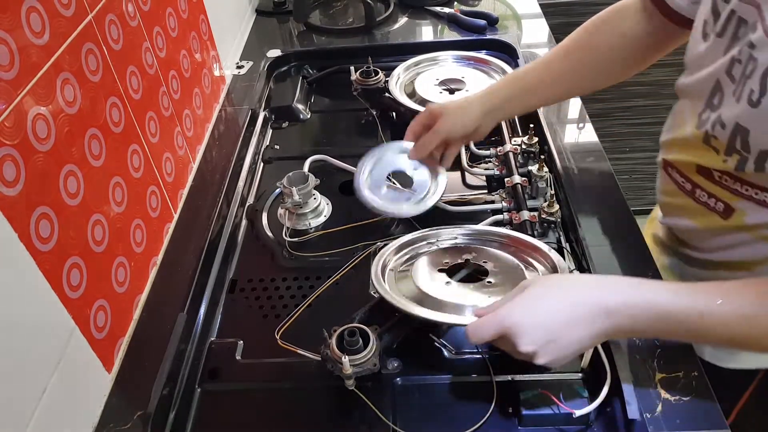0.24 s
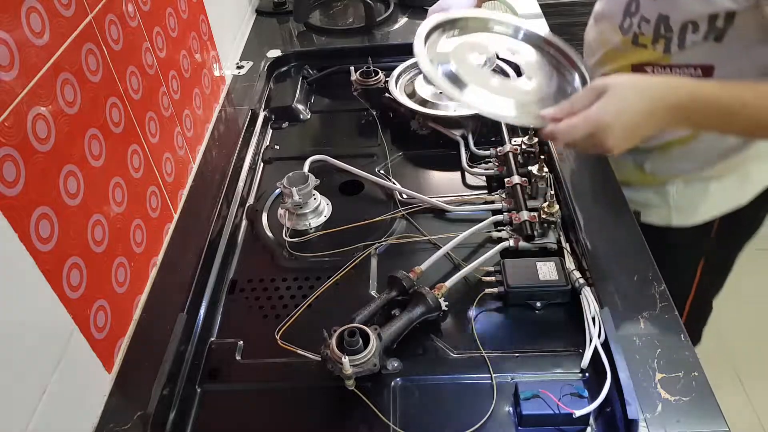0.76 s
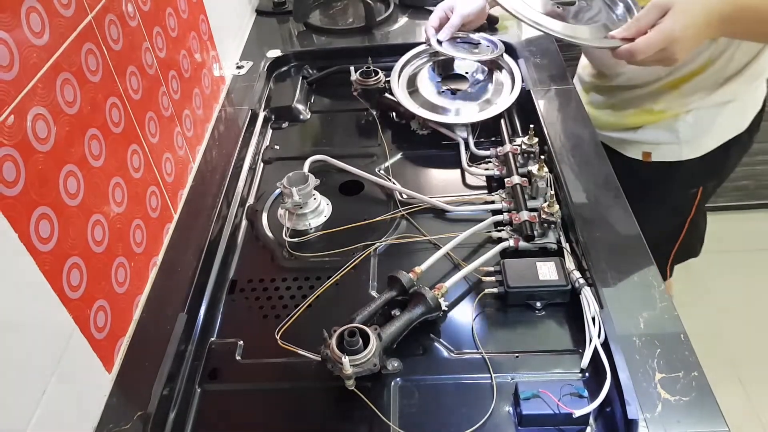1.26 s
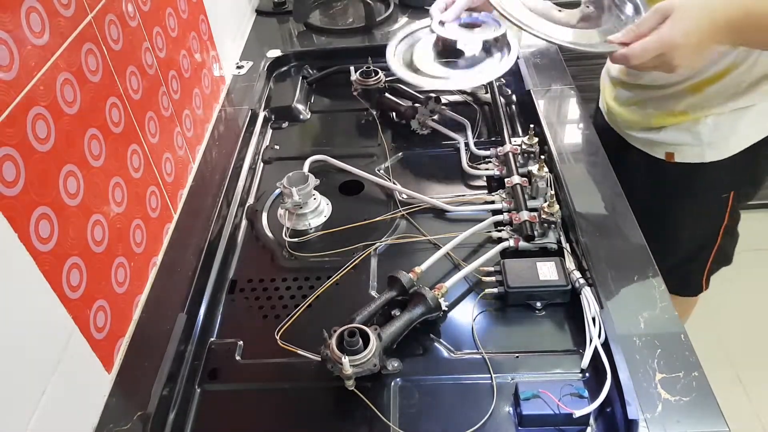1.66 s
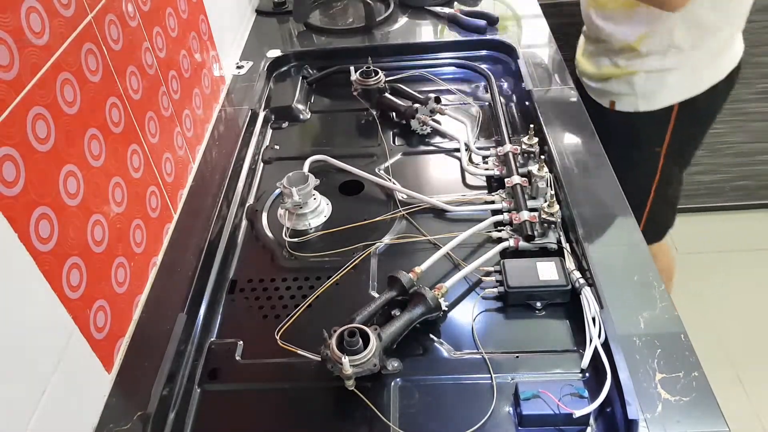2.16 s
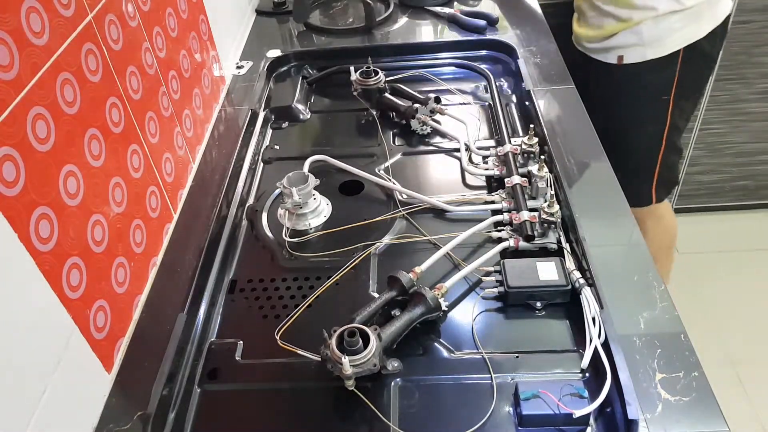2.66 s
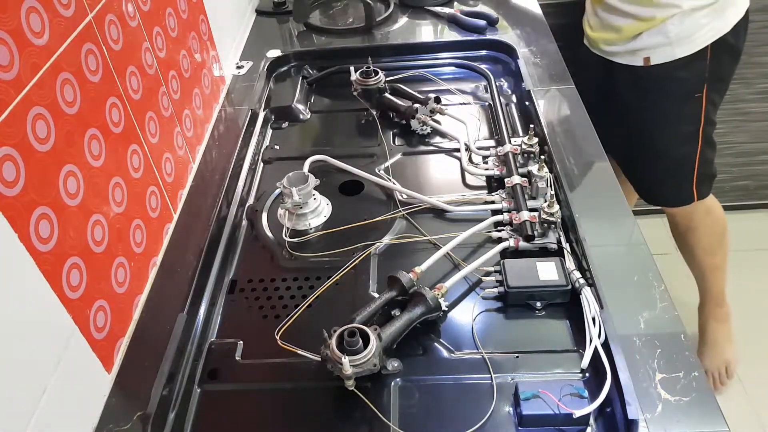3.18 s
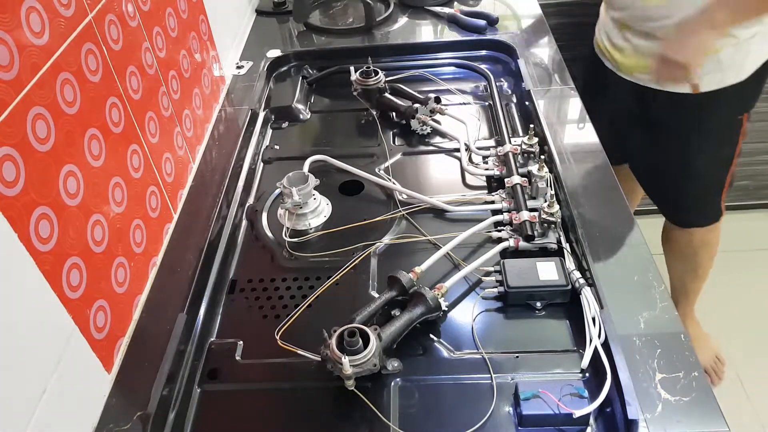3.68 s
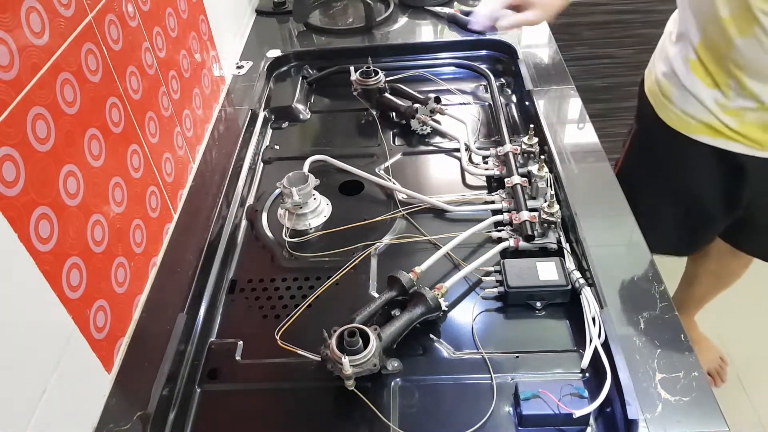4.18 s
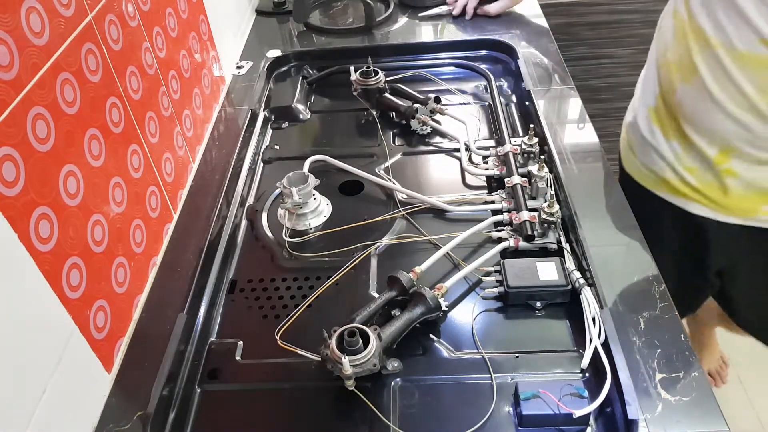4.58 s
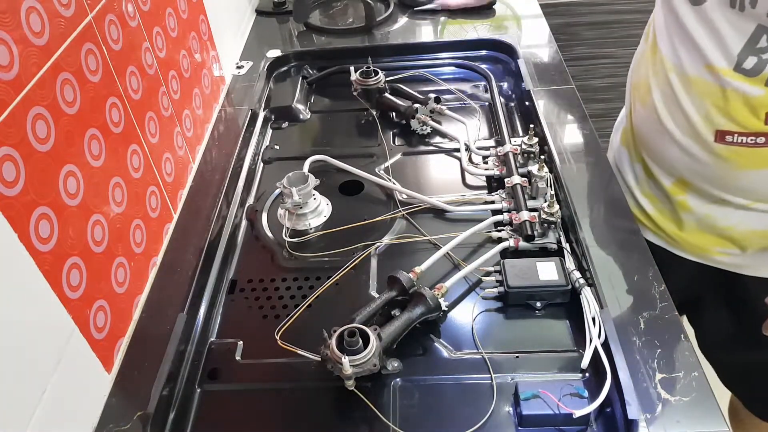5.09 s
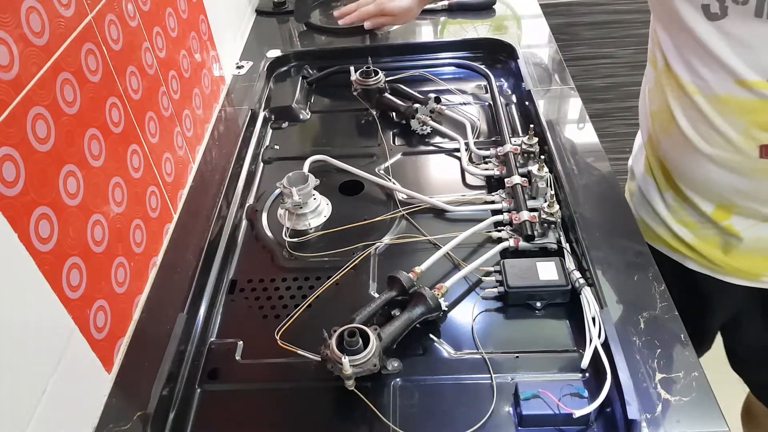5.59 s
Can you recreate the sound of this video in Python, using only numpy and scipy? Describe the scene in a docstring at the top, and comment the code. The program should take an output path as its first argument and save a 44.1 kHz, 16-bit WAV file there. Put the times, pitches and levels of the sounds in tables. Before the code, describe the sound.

Thin steel plates knock a metal tray, clash in the hands, then clatter down in a stack on a worktop, ending with a hard knock.

```python
"""Thin stainless burner plates are lifted off an open gas hob in a tiled kitchen, clash in the hands,
and are laid on the worktop, where they scrape and rattle; then something hard is put down beside the hob.
Blows are clicks with a chattering tail; drags, brushing and a breathy hiss are trains of tiny impulses.
Each blow rings a few strong modes over a noisy crowd of weak ones, and the hard room answers;
still air and a low, wavering motor hum lie underneath."""
import sys
import numpy as np
from scipy import signal
from scipy.fft import rfft, irfft
from scipy.io import wavfile

SR = 44100
rng = np.random.default_rng(int(sys.argv[2]) if len(sys.argv) > 2 else 0)


def wrap_up_sound(samples):
    """Save the sound to the file named by the first command line argument, as 16-bit audio."""
    columns = np.atleast_2d(samples).T
    # keep every value between -1 and 1, then stretch to whole-number steps
    tamed = np.clip(columns, -1, 1)
    steps = np.round(tamed * 32767).astype(np.int16)
    wavfile.write(sys.argv[1], SR, steps)


N = 257567
TIME = np.arange(N) / SR
RING_TIME = TIME[:int(1.6 * SR)]

# still air: (frequency [Hz], density [dB per Hz])
AIR_COLOUR = [(25, -11.5), (60, -7), (85, -9.5), (130, -9), (250, -17), (400, -27), (800, -33), (1600, -39),
              (3000, -38), (6000, -33.5), (9000, -43), (16000, -37)]
AIR_DB = -59
# motor hum: (frequency [Hz], level [dB])
MOTOR_HUM = [(99.3, -56.5), (68, -68.5), (251, -74)]
# the room's decay: (frequency [Hz], t60 [s])
ROOM_DECAY = [(80, 0.93), (250, 0.75), (1000, .65), (3000, 0.64), (7000, 0.56), (15000, 0.45)]
# how alike the two ears are: (frequency [Hz], correlation [-1 to 1])
EAR_LIKENESS = [(60, 1), (150, .9), (350, 0.79), (700, 0.4), (1400, 0.032), (4000, 0.06), (14000, 0.55)]
# balance of the noise: (frequency [Hz], left minus right [dB])
EAR_BALANCE = [(60, 3), (200, 6), (700, -1), (2500, 1), (6000, 1.5), (13000, 3.5)]
TOP_HZ = 15900  # upper edge of the recorder's band
STROKE_RANGE_DB = 19.5  # a stroke gains this much over its swell and loses it over its release

# a plate leans on the tray and shifts dully: (peak [s], level [dB], swell [s], release [s])
TRAY_RUBS = [(0.005, -29, .1, 0.14), (0.14, -31, .06, .07), (0.765, -46, .04, .06)]
# plates knock on the steel tray: (time [s], level [dB], bass [dB], treble [dB], chatter [s])
TRAY_BLOWS = [(0.0875, -25, -3, -15, 0.0007), (0.096, -31, -2, -1.5, 0.006),
              (0.172, -27, -8.5, -9.5, 0.001), (0.2025, -18.5, -17.5, 11, 0.0012),
              (0.216, -23.5, 9.5, -8.5, 0.01)]
# strong modes of the tray: (frequency [Hz], level [dB], t60 [s])
TRAY_MODES = [(72, -7, 1.4), (103.4, -11, 0.65), (153.3, -13, 2), (253, -12.5, 0.35), (303, -6, 0.46),
              (422, -13.5, 0.5), (521, -4.5, 0.45), (2990, -8, 0.56), (3970, -12.5, .45),
              (5800, -13.5, .35), (10600, -20.5, 0.52), (13800, -15.5, .35), (14153, -10, .35)]
# weak modes of the tray: (frequency [Hz], density [dB per Hz])
TRAY_COLOUR = [(50, -17), (75, -4.5), (150, -3), (300, 2.5), (600, -2), (1000, -1), (2000, -5.5),
               (3000, -4), (4600, -7.5), (7000, -12.5), (9500, -16.5), (13000, -16), (16000, -20.5)]
# the last plate slides off the tray: (peak [s], level [dB], swell [s], release [s])
LIFT_STROKES = [(1.43, -44.5, 0.053, 0.16), (1.52, -47, 0.16, 0.053)]
# strong modes under that slide: (frequency [Hz], level [dB], t60 [s])
LIFT_RING = [(145.3, -6, 0.32), (444, -18, 0.48), (810, -5.5, 0.39)]
# weak modes under that slide: (frequency [Hz], density [dB per Hz])
LIFT_CROWD = [(60, -14), (150, 2), (260, 4), (480, -1), (850, 5), (1200, -16), (3000, -14), (16000, -51)]

# plates held free in the air sing on: (start [s], frequency [Hz], level [dB], t60 [s])
SINGING_MODES = [(0.203, 2293, -50, 3.0), (0.817, 3755, -34, 1.5), (0.817, 3250, -35, 1.6),
                 (0.817, 3140, -39, 1.0), (0.817, 1400, -47, 1.3), (0.817, 2340, -48, 1.2),
                 (0.817, 2070, -52, 1.6), (0.817, 3600, -47, 1.0)]
# the large plates clash: (time [s], level [dB], bass [dB], treble [dB], chatter [s])
PLATE_CLASHES = [(0.816, -13.5, -2.5, 6, 0.0024), (0.837, -13, 3.5, -1.5, 0.0064),
                 (0.872, -16.5, 5, -4, 0.0045), (0.892, -15.5, -9.5, -26, 0.0043)]
# strong modes of the clash: (frequency [Hz], level [dB], t60 [s])
CLASH_RING = [(72, -19.5, 1.3), (102, -18, 1), (253, -23, 0.36), (294.4, -13, .5), (484, -13.5, .5),
              (1520, -17.5, 0.4), (1703, -16, 0.59), (823, -8, .55), (1294, -16, .6), (4370, -8, .38),
              (4462, -12, .38), (2270, -19, 0.93), (2590, -13.5, 0.6), (2740, -19, 0.59),
              (3360, -19.5, 0.33), (3960, -11.5, 0.44), (3940, -14, 0.43), (4310, -12.5, 0.5)]
# weak modes of the clash: (frequency [Hz], density [dB per Hz])
CLASH_CROWD = [(50, -23), (100, -10), (280, 2), (550, 0.5), (1000, -7.5), (1700, -1.5), (2100, -9.5),
               (2800, -0.5), (3600, -8), (4300, 2.5), (5000, -7), (7500, -13), (9500, -22.5), (16000, -19)]

# faint bright brushing over the ringing plates, then brisker rubs:
# (peak [s], level [dB], swell [s], release [s])
BRIGHT_BRUSHES = [(0.55, -52.5, .04, .15), (1.12, -45.5, .2, 0.3), (1.338, -31.5, 0.051, 0.039),
                  (1.58, -55, 0.076, .03)]
# bright colour of the brushing: (frequency [Hz], density [dB per Hz])
BRUSH_COLOUR = [(500, -5), (2000, -1), (3000, 2), (4500, -1.5), (5600, -12), (7200, -7), (9000, -12.5),
                (13000, -8.5), (16000, -8)]

# light touches on the small plate: (time [s], level [dB], bass [dB], treble [dB], chatter [s])
SMALL_TOUCHES = [(1.4115, -38.5, 1, 3.5, 0.0021), (1.565, -58, -3, 10.5, 0.0064),
                 (2.166, -27.5, -15, -5, 0.0019)]
# strong modes of the small plate: (frequency [Hz], level [dB], t60 [s])
SMALL_MODES = [(805, -16.5, 0.68), (1580, -30, 0.7), (1930, -22, 0.38), (2540, -13.5, 0.65),
               (2870, -20, 0.62), (4050, -22, 0.59), (4200, -14, 0.28), (4450, -17, 0.44),
               (5750, -14, 0.32), (7149, -15, 0.54)]
# weak modes of the small plate: (frequency [Hz], density [dB per Hz])
SMALL_COLOUR = [(80, -43), (300, 7), (600, -12), (900, -1), (1300, -12), (2400, -3), (4200, 0),
                (5200, -6.5), (7300, -4.5), (9000, -11), (16000, -7.5)]
# the small plate slides along the worktop: (peak [s], level [dB], swell [s], release [s])
SMALL_SLIDES = [(1.97, -57, 0.12, 0.25), (2.158, -42.5, 0.075, .015)]
# weak modes of that slide: (frequency [Hz], density [dB per Hz])
SMALL_SLIDE_COLOUR = [(300, -16), (1400, -17), (2000, -4.5), (2800, 0.5), (4300, -1.5), (5400, -10),
                      (7000, -14.5), (16000, -32)]

# a large plate lands on the worktop: (time [s], level [dB], bass [dB], treble [dB], chatter [s])
FIRST_LANDING = [(2.703, -27, -33, 4.5, 0.0033), (2.720, -26, -5.5, 4.5, 0.0076),
                 (2.764, -27, -26.5, -13.5, 0.00075), (2.882, -34, -16.5, 9.5, .008),
                 (2.904, -33.5, -11, -1, 0.0027)]
# it shivers on its rim: (peak [s], level [dB], swell [s], release [s])
FIRST_SHIVER = [(2.735, -28, .03, .24), (2.88, -25.5, .17, .07)]
# strong modes of the first plate: (frequency [Hz], level [dB], t60 [s])
FIRST_RING = [(823, -4.5, 0.15), (846, -14.5, 0.26), (996, -13.5, 0.8), (1190, -15, 0.38),
              (1275, -11, 0.78), (1645, -15.5, 0.27), (1600, -10, 0.36), (2430, -19, .45),
              (3216, -15, 0.94), (3870, -11.5, 0.81), (4230, -14, 0.4), (4340, -10.5, 0.66),
              (5028, -20.5, 0.24), (7900, -15.5, .45)]
# weak modes of the first plate: (frequency [Hz], density [dB per Hz])
FIRST_CROWD = [(80, -27), (450, -16), (660, -17.5), (800, -2), (1050, 2), (1600, 4), (2200, -6), (3200, -2),
               (4300, 1.5), (4900, -5.5), (7500, -12.5), (10000, -17.5), (15500, -13.5)]

# the second large plate lands on the first: (time [s], level [dB], bass [dB], treble [dB], chatter [s])
STACK_LANDING = [(3.096, -19.5, 2, 7.9, 0.00053), (3.127, -18.5, 12, 4.9, .006),
                 (3.142, -23.5, -13, 5, 0.0044), (3.180, -23.5, 4.5, 6.9, 0.011),
                 (3.308, -38.5, -9, 19.4, 0.0052), (3.329, -21, -8, 2.4, 0.012)]
# one large plate grinds on the other: (peak [s], level [dB], swell [s], release [s])
STACK_GRIND = [(3.19, -32.5, 0.19, 0.25), (3.34, -26.5, .05, 0.17), (3.51, -39, 0.27, 0.043)]
# strong modes of the stack: (frequency [Hz], level [dB], t60 [s])
STACK_RING = [(808, -14, 0.15), (945, -12, 0.27), (1165, -14.5, 0.96), (1311, -15, 0.78), (1564, -17, 0.32),
              (1673, -10.5, .4), (1780, -24.5, .5), (2406, -16.5, 0.35), (2620, -18.5, .6),
              (2620, -16, .35), (2920, -20.5, .35), (3060, -10.5, .55), (4140, -26, .35), (4080, -20, .35),
              (4290, -13, .35), (4440, -7.5, 0.53), (4500, -21.5, 0.44), (5500, -23, .35),
              (5740, -15.5, 0.77), (7440, -23.5, 0.51), (8053, -19, 0.52), (10840, -15.5, .3),
              (11800, -14, 0.33), (13000, -20, 0.28)]
# weak modes of the stack: (frequency [Hz], density [dB per Hz])
STACK_CROWD = [(80, -27.5), (450, -14.5), (660, -20.5), (800, -2.5), (1050, -4.5), (1650, 2), (2200, -6),
               (2650, 3), (3400, -8), (4400, 2), (4900, -6.5), (7500, -13), (10000, -15.5), (15500, -10)]

# a faint breathy hiss swells and fades: (peak [s], level [dB], swell [s], release [s])
HISS_SWELLS = [(3.73, -48.5, 0.27, 0.3)]
# colour of the hiss, strongest around 3 kHz: (frequency [Hz], density [dB per Hz])
HISS_COLOUR = [(500, -25.5), (1500, -8.5), (2300, 0), (3100, 6.5), (3600, -10), (6000, -15.5),
               (16000, -31.5)]

# a body brushes the worktop: (peak [s], level [dB], swell [s], release [s])
BODY_BRUSHES = [(3.90, -52, 0.16, 0.084), (5.455, -55, 0.086, 0.093)]
# soft bumps against the worktop: (time [s], level [dB], bass [dB], treble [dB], chatter [s])
PALM_BUMPS = [(4.361, -49.5, -12, 0.63, .002), (4.371, -37, -4, 1.2, 0.006), (4.385, -35.5, 9, 1.5, 0.0036)]
# strong modes of the cabinet below: (frequency [Hz], level [dB], t60 [s])
CABINET_MODES = [(164.7, -13.5, 0.58), (242, -7, 0.48), (619, -15, 0.35)]
# weak modes of worktop and cabinet: (frequency [Hz], density [dB per Hz])
CABINET_COLOUR = [(60, -12), (200, -4.5), (550, -5), (900, -11.5), (1700, -19), (3000, -12.5),
                  (5500, -11.5), (9000, -23), (15000, -26)]

# a hard object is shifted and put down: (time [s], level [dB], bass [dB], treble [dB], chatter [s])
OBJECT_KNOCKS = [(4.616, -60.5, -24.5, 22.5, .001), (4.636, -58.5, -22, 19, .01),
                 (4.6825, -12, -19.5, -2.5, 0.003), (4.700, -27.5, -9, -22.5, 0.0064),
                 (4.7455, -29.5, 11, -22, 0.0017)]
# strong modes of the knock: (frequency [Hz], level [dB], t60 [s])
KNOCK_RING = [(137.6, -17, 0.73), (313.5, -15, 0.31), (481, -10.5, 0.39), (860, -18.5, 0.58),
              (1324, -15, 0.59), (1460, -27, 0.38), (5300, -11, 0.35), (5930, -21.5, 0.28),
              (9200, -39, 0.34), (11800, -24, 0.26)]
# weak modes of the knock: (frequency [Hz], density [dB per Hz])
KNOCK_CROWD = [(50, -12), (130, -9), (300, -2.5), (750, -3), (1100, -3.5), (1500, -1), (2200, -8),
               (3100, -0.5), (4200, -7.5), (5500, -5.5), (8000, -12.5), (10000, -12.5), (13000, -6.5),
               (16000, -18.5)]


def undb(db):
    """Decibels to gain."""
    return 10 ** (np.asarray(db) / 20)


def along(points, hz):
    """Read (Hz, value) points on a log-frequency axis."""
    f, value = np.transpose(points)
    return np.interp(np.log(np.maximum(hz, 1)), np.log(f), value)


def sway(t, per_s):
    """A slow random wander for each ear: straight lines between per_s random values a second."""
    knots = rng.standard_normal((400, 2)).T
    return np.array([np.interp(t * per_s, np.arange(len(row)), row) for row in knots])


def fade(t60, t=RING_TIME):
    """Free decay, 60 dB down after t60 seconds."""
    return np.exp(-np.log(1000) * t / t60)


def stereo_noise(colour, size):
    """Two-channel coloured noise of rms 1; the ears share part of it, most of all in the bass."""
    hz = np.arange(size // 2 + 1) * SR / size
    mid, side = np.exp(2j * np.pi * rng.random((2, len(hz))))
    alike = along(EAR_LIKENESS, hz)
    sign = np.array([[1], [-1]])  # left, right
    spectrum = mid * np.sqrt(1 + alike) + sign * side * np.sqrt(1 - alike)
    level_db = along(colour, hz) + sign * along(EAR_BALANCE, hz) / 2
    x = irfft(spectrum * undb(level_db), size)
    return x / x.std()


def room_fade(x):
    """Let each octave of x die away at the room's own rate."""
    spectrum = rfft(x)
    hz = np.arange(x.shape[-1] // 2 + 1) * SR / x.shape[-1]
    centres = 2. ** np.arange(6, 15)
    out = 0
    for centre in centres:
        # overlapping octave bands that add up to a flat response
        band = along(np.c_[centres, centres == centre], hz)
        out = out + irfft(spectrum * band) * fade(along(ROOM_DECAY, centre))
    return out


def contacts(size, per_s, spread_db):
    """Tiny impulses of uneven strength at random moments; rms 1."""
    hits = rng.random(size) < per_s / SR
    x = hits * rng.choice([-1, 1], size) * undb(spread_db * rng.standard_normal(size))
    return x / x.std()


def blows(rows, chatter_share=0.9, bass_hz=450, treble_hz=6500, chatter_hz=600):
    """Force of each blow: a click, then the rim chatters; weight adds bass, a sharp edge adds treble."""
    force, t = np.zeros(N + SR), TIME[:SR // 5]
    low = signal.butter(1, bass_hz, fs=SR)
    high = signal.butter(1, treble_hz, "high", fs=SR)
    light = signal.butter(2, chatter_hz, "high", fs=SR)  # the rebounds are too light to carry bass
    for s, db, bass_db, treble_db, chatter_s in rows:
        rebounds = contacts(len(t), per_s=5000, spread_db=1.1) * np.exp(-t / chatter_s)
        push = signal.lfilter(*light, rebounds)
        push *= np.sqrt(chatter_share / (np.sum(push ** 2) + 1e-12))
        push[0] += np.sqrt(1 - chatter_share)  # the click
        push = push + (undb(treble_db) - 1) * signal.lfilter(*high, push)
        push = push + (undb(bass_db) - 1) * signal.lfilter(*low, push)
        start = int(s * SR)
        force[start:start + len(t)] += undb(db) * push
    return force[:N]


def drag(strokes, per_s, spread_db):
    """Random tiny impulses, per_s a second, that swell and fade with each stroke, as in a rub or a hiss."""
    power = np.zeros(N)
    for s, db, swell_s, release_s in strokes:
        away = np.maximum((s - TIME) / swell_s, (TIME - s) / release_s)
        sounding = (TIME > s - swell_s) & (away < 2)
        power += sounding * undb(db - STROKE_RANGE_DB * away) ** 2
    # some 17 ms of impulses add up to the stroke's level
    return np.sqrt(power) * contacts(N, per_s, spread_db) / np.sqrt(0.017 * SR)


def clustered(colour, cluster_db):
    """Crowded modes bunch and leave gaps: random ripple every 30 Hz, every 90 Hz above 900 Hz."""
    hz = np.r_[40:900:30, 900:17000:90]
    ripple_db = cluster_db * np.minimum(hz / 1500, 1) * rng.standard_normal(len(hz))
    return np.c_[hz, along(colour, hz) + ripple_db]


def crowd(force, colour, t60, room_db):
    """The many weak modes die fast, and the tiled room holds their sound a little longer."""
    colour = clustered(colour, cluster_db=2.2)
    direct = stereo_noise(colour, len(RING_TIME)) * fade(t60)
    build_up = 1 - fade(0.11)
    walls = room_fade(stereo_noise(colour, len(RING_TIME))) * build_up
    return signal.fftconvolve(force[None], direct + undb(room_db) * walls, axes=1)[:, :N]


def ring(force, modes, modes_db, flutter_db=2, wander=1.0):
    """Each strong mode stores the energy that the force has near its pitch and loses it at its own rate."""
    out, pushed = np.zeros((2, N)), np.flatnonzero(force)
    span = slice(pushed[0], pushed[-1] + SR)
    t = TIME[span]
    for hz, db, t60 in modes:
        near = signal.butter(1, [hz / 2, min(hz * 2, SR / 2.2)], "band", fs=SR)
        width = np.sum(signal.lfilter(*near, signal.unit_impulse(SR // 10)) ** 2)
        power = signal.lfilter(*near, force[span] + 1e-18) ** 2
        # stored energy goes as amplitude squared, so its factor per sample is squared too
        energy = signal.lfilter([1 / width], [1, -fade(t60, 2 / SR)], power)
        # reflections make short waves flutter and reach the two ears out of step
        apart = min(hz / 1100, 1)
        ear_offset = rng.permutation([[1], [-1]]) * np.pi / 4
        phase = apart * (wander * sway(t, 14) + ear_offset)
        gain = undb(db + modes_db + apart * flutter_db * sway(t, 22))
        out[:, span] += gain * np.sqrt(energy) * np.sin(2 * np.pi * hz * t + phase)
    return out


def kitchen(waver=0.46):
    """Still air as coloured noise, and a motor's hum as sines that waver slightly in level and phase."""
    out = stereo_noise(AIR_COLOUR, N) * undb(AIR_DB)
    for hz, db in MOTOR_HUM:
        swell, drift = waver * sway(TIME, 21)
        out = out + undb(db) * np.sqrt(2) * (1 + swell) * np.sin(2 * np.pi * hz * TIME + drift)
    return out


def hob(rub_hz=450):
    """The steel tray booms and grumbles under the plates, and rumbles as the last one slides off."""
    dull = signal.butter(1, rub_hz, fs=SR)
    rubs = signal.lfilter(*dull, drag(TRAY_RUBS, per_s=900, spread_db=2))
    knocks = blows(TRAY_BLOWS, chatter_share=0.11) + rubs
    slide = drag(LIFT_STROKES, per_s=500, spread_db=3.5)
    tray = crowd(knocks, TRAY_COLOUR, t60=0.13, room_db=-9.5) + ring(knocks, TRAY_MODES, modes_db=-10.5)
    lift = crowd(slide, LIFT_CROWD, t60=0.22, room_db=-23) + ring(slide, LIFT_RING, modes_db=1.5)
    return tray + lift


def held_plates():
    """The plates clash in the hands; a few modes escape the fingers and waver as the plates turn."""
    force = blows(PLATE_CLASHES)
    out = crowd(force, CLASH_CROWD, t60=0.2, room_db=-7.5) + ring(force, CLASH_RING, modes_db=-5.0)
    for s, hz, db, t60 in SINGING_MODES:
        age = np.maximum(TIME - s, 0)
        level = (age > 0) * undb(db + 4.1 * sway(age, 23))
        tone = np.sin(2 * np.pi * hz * age + 2.3 * sway(age, 17))
        out = out + level * tone * fade(t60, age)
    return out


def bright_brushing():
    """Faint bright brushing over the ringing plates, then brisker rubs, from sparse uneven impulses."""
    return crowd(drag(BRIGHT_BRUSHES, per_s=390, spread_db=8), BRUSH_COLOUR, t60=0.12, room_db=-7.5)


def small_plate():
    """The small plate is tapped, slides along the worktop and clinks down."""
    touches = blows(SMALL_TOUCHES)
    scrape = drag(SMALL_SLIDES, per_s=1200, spread_db=4.5)
    plate = crowd(touches, SMALL_COLOUR, t60=0.11, room_db=-4.5) + ring(touches, SMALL_MODES, modes_db=0.0)
    return plate + crowd(scrape, SMALL_SLIDE_COLOUR, t60=0.39, room_db=-15.0)


def first_plate():
    """A large plate lands on the worktop and shivers on its rim; both forces drive the same modes."""
    force = blows(FIRST_LANDING, chatter_share=.6) + drag(FIRST_SHIVER, per_s=240, spread_db=5.5)
    return crowd(force, FIRST_CROWD, t60=0.16, room_db=-6.0) + ring(force, FIRST_RING, modes_db=-5.0)


def stacked_plates():
    """The second large plate lands on the first, rattles, slips and settles."""
    force = blows(STACK_LANDING) + drag(STACK_GRIND, per_s=310, spread_db=1.5)
    return crowd(force, STACK_CROWD, t60=0.21, room_db=-3.5) + ring(force, STACK_RING, modes_db=-4.5)


def breathy_hiss():
    """A faint breathy hiss around 3 kHz swells and fades, from dense impulses blurred by coloured noise."""
    return crowd(drag(HISS_SWELLS, per_s=1400, spread_db=6.5), HISS_COLOUR, t60=0.22, room_db=-12)


def soft_thumps():
    """A body brushes the worktop and a palm bumps it; the cabinet below thuds."""
    bumps = blows(PALM_BUMPS, chatter_share=0.26)
    brush = drag(BODY_BRUSHES, per_s=430, spread_db=5.0)
    body = crowd(bumps + brush, CABINET_COLOUR, t60=.1, room_db=-8.0)
    return body + ring(bumps, CABINET_MODES, modes_db=1.5)


def worktop():
    """A hard object ticks against the worktop and is put down with a dry knock."""
    force = blows(OBJECT_KNOCKS, chatter_share=.2)
    return crowd(force, KNOCK_CROWD, t60=0.2, room_db=-7.5) + ring(force, KNOCK_RING, modes_db=-6.5)


def scene():
    """Everything that sounds in the kitchen."""
    handling = hob() + held_plates() + bright_brushing() + small_plate()
    laying_down = first_plate() + stacked_plates() + soft_thumps() + worktop()
    return kitchen() + handling + laying_down + breathy_hiss()


def record(dry):
    """The microphone loses the deepest bass and the recorder cuts the top."""
    thin = signal.sosfilt(signal.butter(3, 50, "high", fs=SR, output="sos"), dry)
    return signal.sosfilt(signal.ellip(10, .2, 80, TOP_HZ, fs=SR, output="sos"), thin)


dry = scene()
out = record(dry)
wrap_up_sound(out)
```